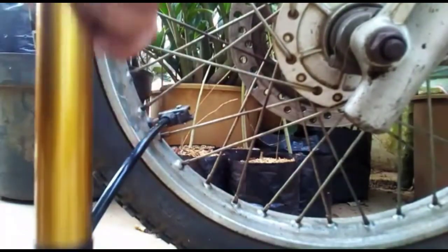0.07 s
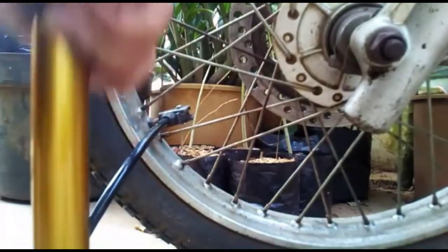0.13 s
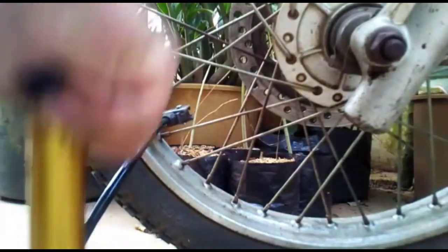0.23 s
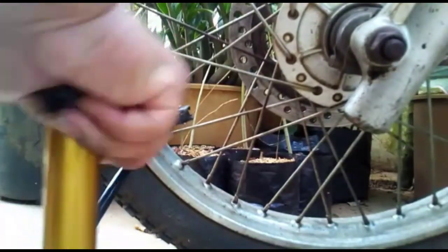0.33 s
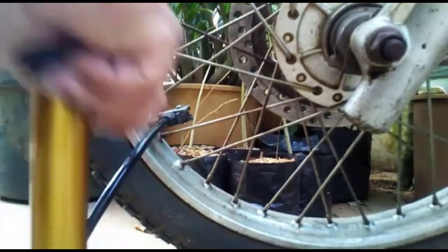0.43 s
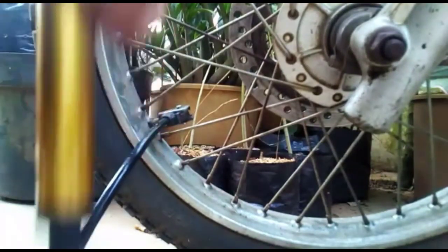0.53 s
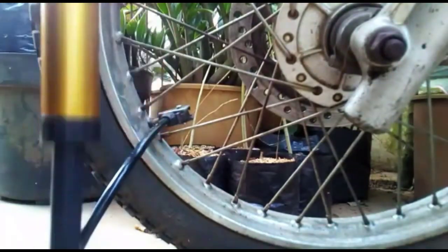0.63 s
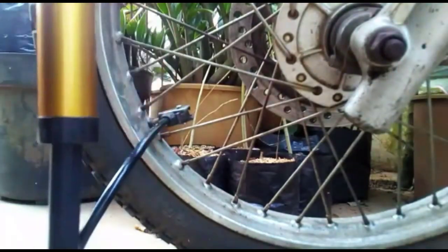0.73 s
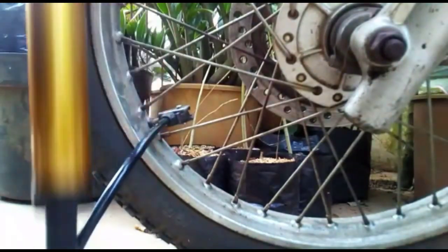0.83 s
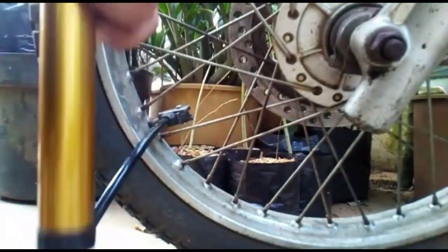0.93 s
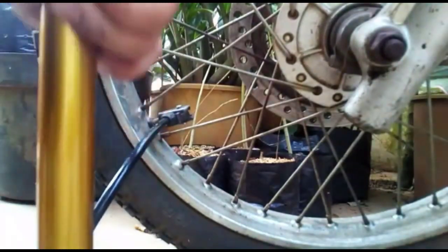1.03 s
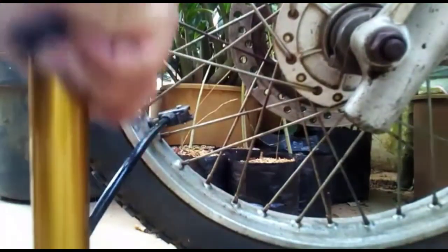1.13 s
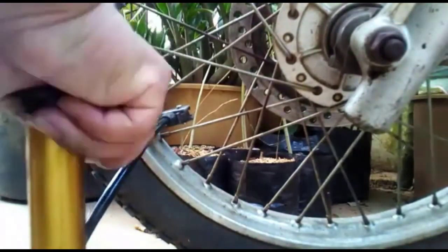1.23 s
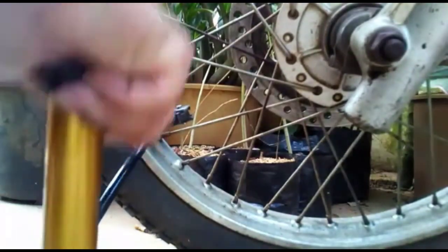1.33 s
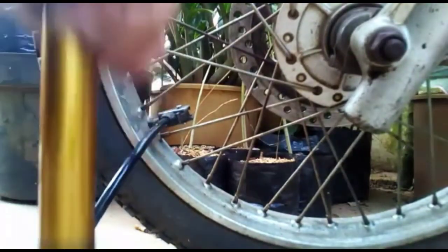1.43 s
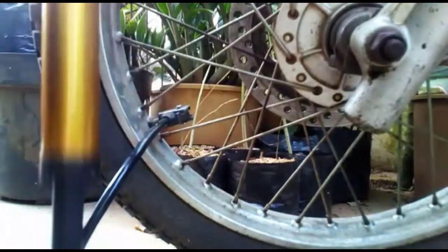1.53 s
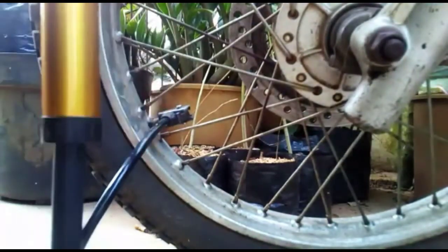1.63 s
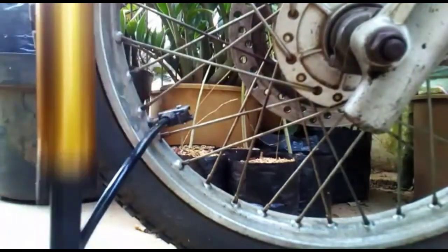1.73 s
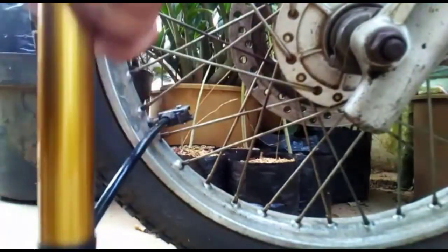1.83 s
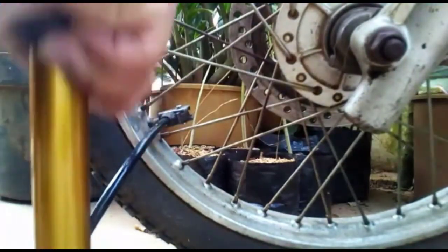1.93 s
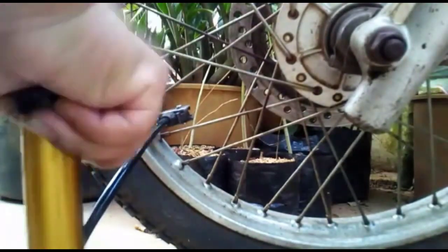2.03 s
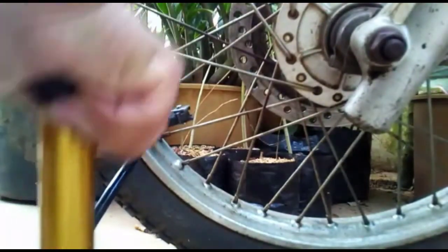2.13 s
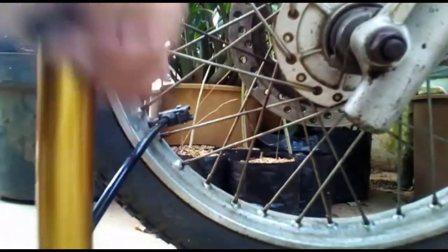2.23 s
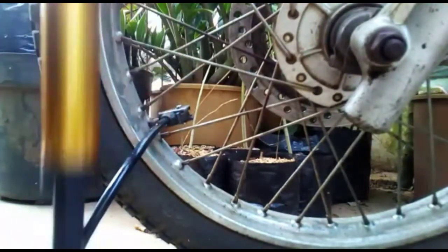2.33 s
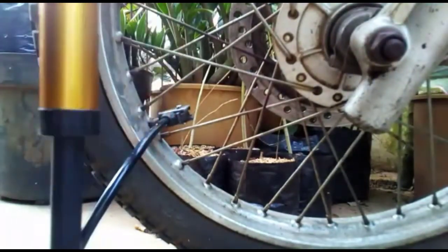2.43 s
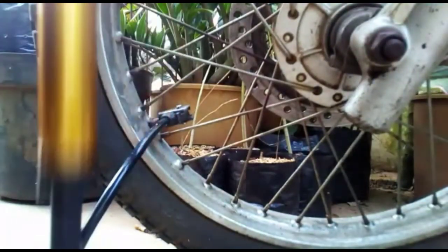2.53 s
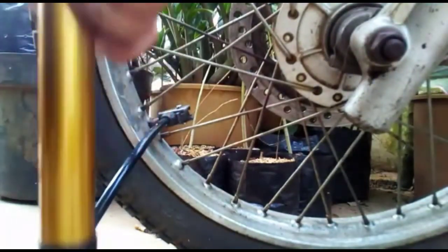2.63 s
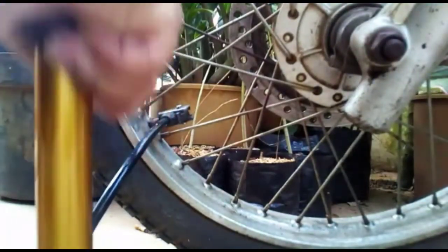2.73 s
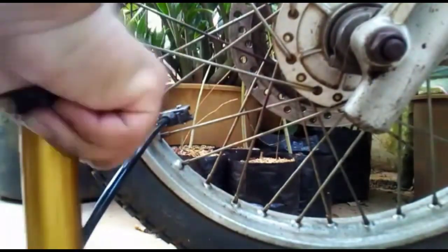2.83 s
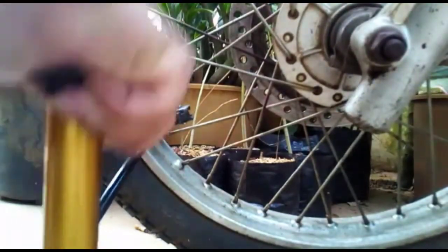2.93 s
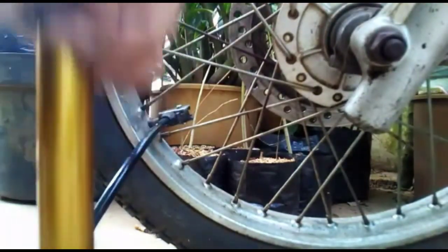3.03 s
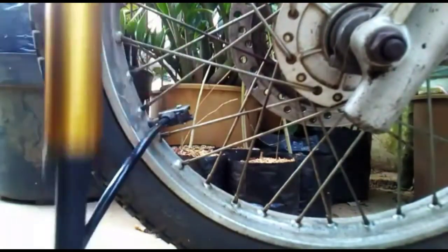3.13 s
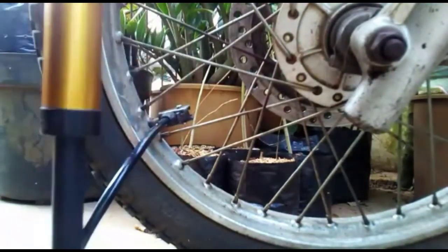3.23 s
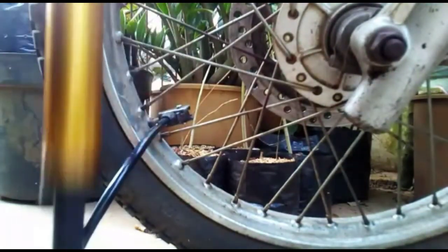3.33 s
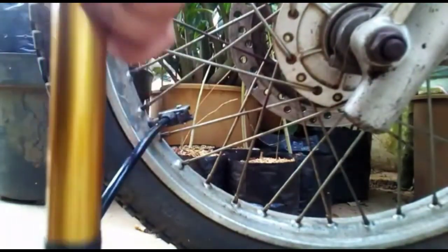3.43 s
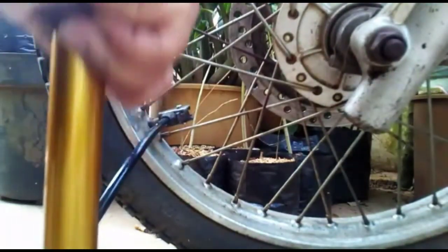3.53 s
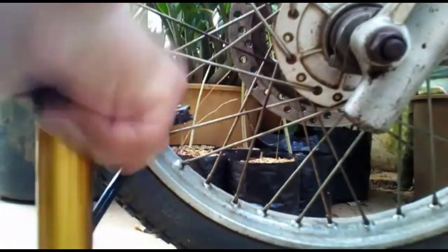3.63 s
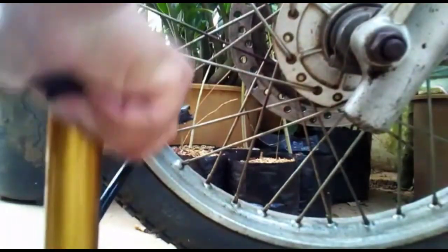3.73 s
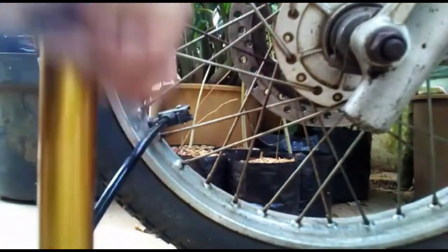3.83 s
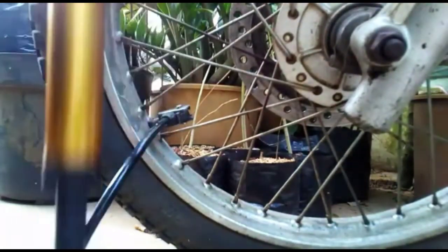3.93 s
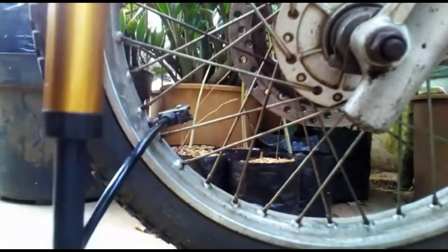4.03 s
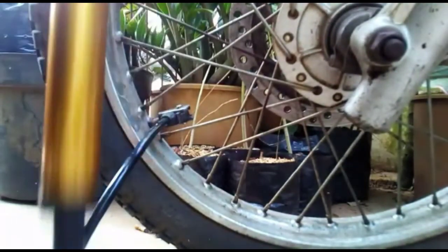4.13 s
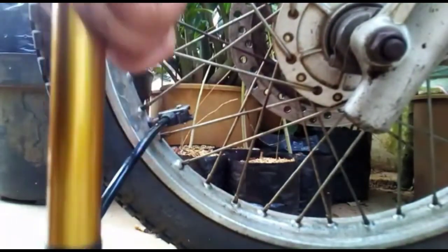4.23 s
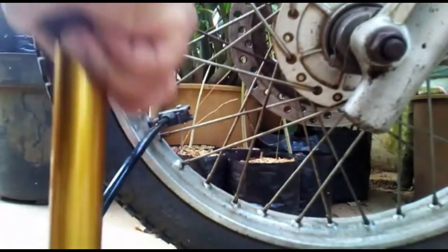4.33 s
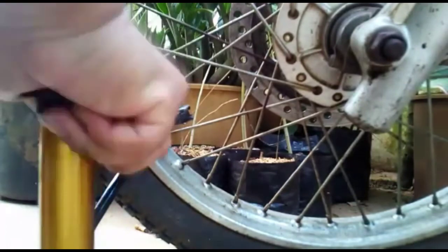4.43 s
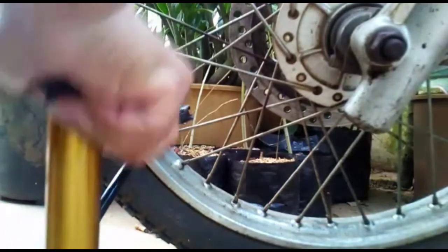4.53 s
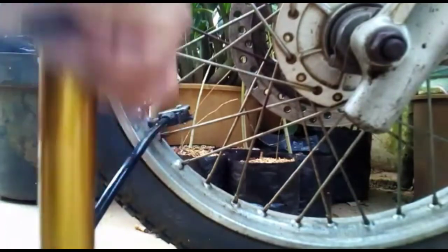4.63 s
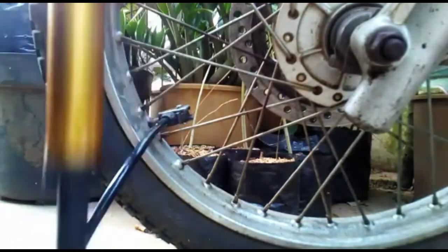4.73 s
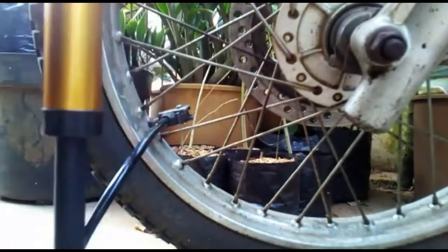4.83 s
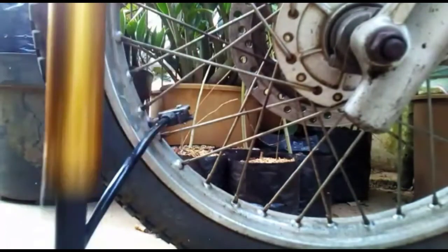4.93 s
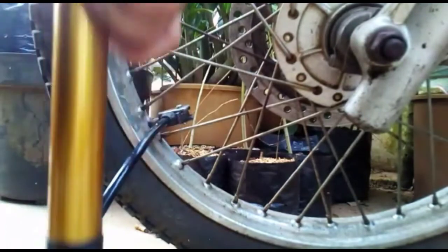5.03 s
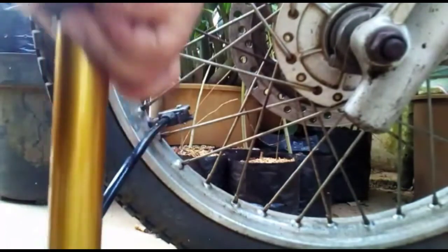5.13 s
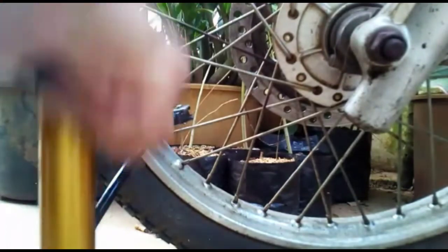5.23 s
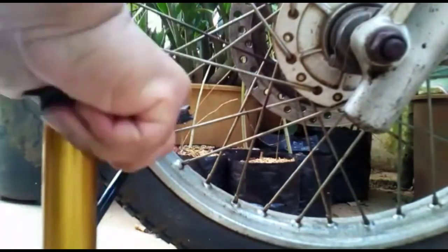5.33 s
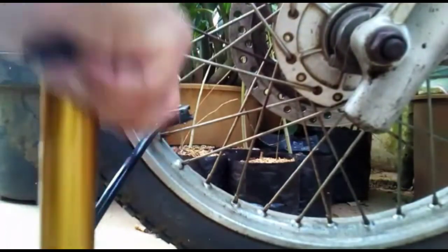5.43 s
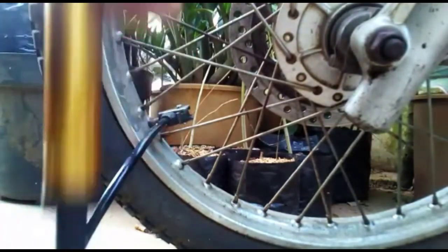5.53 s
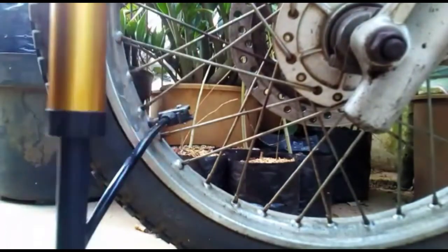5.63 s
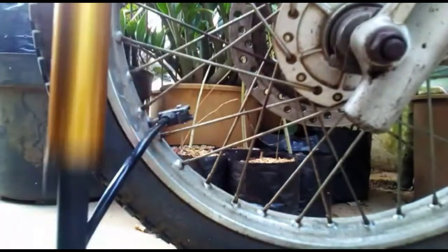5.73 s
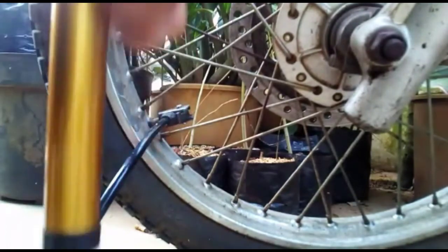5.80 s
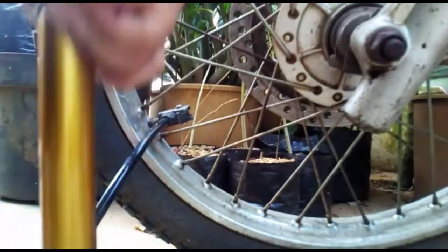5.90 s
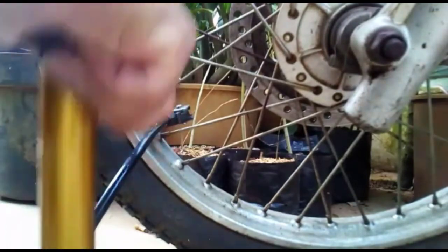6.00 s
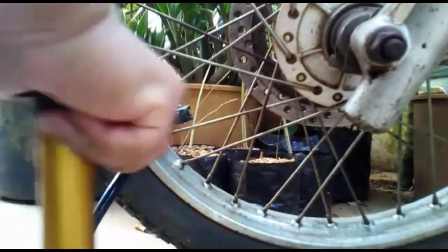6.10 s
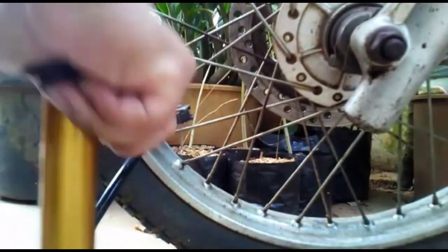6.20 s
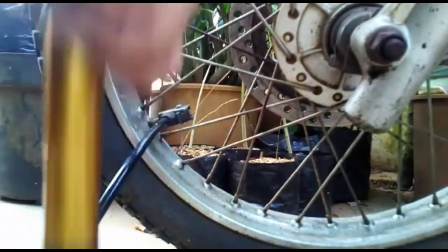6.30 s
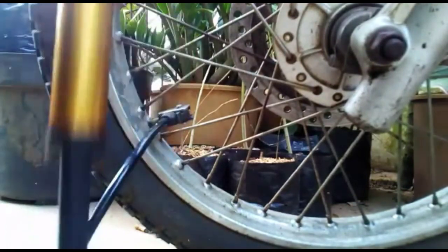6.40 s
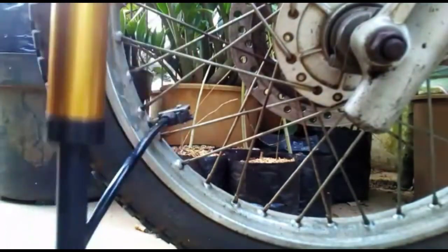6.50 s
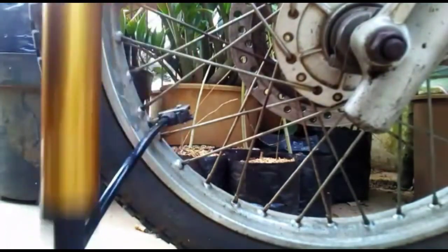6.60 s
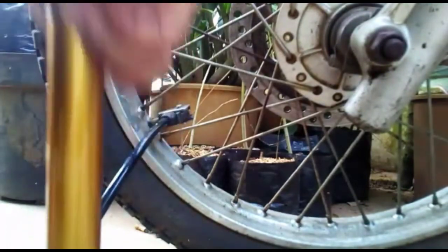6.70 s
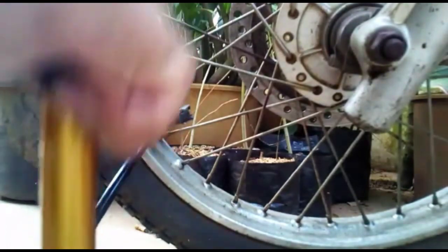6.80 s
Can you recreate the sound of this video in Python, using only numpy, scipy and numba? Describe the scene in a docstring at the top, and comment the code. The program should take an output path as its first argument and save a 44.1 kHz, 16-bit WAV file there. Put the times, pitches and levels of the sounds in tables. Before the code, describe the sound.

A hand pump is worked briskly in a yard, heard from very near. About every 0.8 seconds a hissing, whistling push stops with a clack, followed by a round low pop and a free airy pull. Light metallic ticks, gritty rubbing and brief high squeaks vary each stroke. Background is quiet air and low traffic rumble; the final push is cut off before its clack.

```python
"""A small hand pump inflates a motorcycle tyre in a yard, heard close by.
Air hisses past the sliding barrel and rings a chamber whose length follows the piston, so its resonances glide.
Each push surges and whistles mid-way; all but the last, which runs out of time, end in a clack.
Each pull creeps until the vacuum lets go with a hollow pop, a filtered pulse and ring, then draws air freely.
The seal squeaks and the loose barrel ticks in between, over wall echoes and faint far traffic."""
import sys
import numpy as np
from scipy import signal
from scipy.fft import rfft, irfft
from scipy.io import wavfile
from scipy.ndimage import uniform_filter1d
from numba import njit

SR = 44100
rng = np.random.default_rng(int(sys.argv[2]) if len(sys.argv) > 2 else 0)


def output_pcm(signal):
    """Save a mono or channel-first signal as 16-bit PCM at the path in sys.argv[1].

    Samples are clipped to [-1, 1] before scaling.
    """
    pcm = np.clip(np.atleast_2d(signal).T, -1, 1) * 32767
    wavfile.write(sys.argv[1], SR, np.round(pcm).astype(np.int16))


N = 302526
SOUND_M_S = 343


def undb(db):
    """Decibels to gain."""
    return 10 ** (np.asarray(db) / 20)


def unit(x):
    """Scale to rms 1."""
    return x / np.sqrt(np.mean(x ** 2))


def noise(count=N):
    """White noise."""
    return rng.standard_normal(count)


def seconds(length_s):
    """Time axis of a short sound."""
    return np.arange(int(length_s * SR)) / SR


def curve(rows):
    """Each column of a timed table, sample by sample."""
    s, *columns = np.transpose(rows)
    return [np.interp(np.arange(N) / SR, s, c) for c in columns]


def colour(x, points):
    """Filter by a (Hz, dB) outline, straight over log frequency."""
    hz, db = np.transpose(points)
    f = np.maximum(np.fft.rfftfreq(len(x), 1 / SR), 1)
    gain = undb(np.interp(np.log(f), np.log(hz), db))
    return irfft(rfft(x) * gain, len(x))


def band(x, hz, kind, order=2):
    """Butterworth filter."""
    sos = signal.butter(order, np.minimum(hz, .45 * SR), kind, fs=SR, output="sos")
    return signal.sosfilt(sos, x)


def walk(rate_hz):
    """Random wander through rate_hz points a second, spread near 1."""
    points = noise(int(N / SR * rate_hz) + 2)
    return np.interp(np.arange(N) / SR * rate_hz, np.arange(len(points)), points)


def ring(modes, t, scatter_db):
    """Decaying sines; every blow weights them a little differently."""
    total = 0
    for hz, db, t60_s in modes:
        gain = undb(db + scatter_db * rng.standard_normal())
        total = total + gain * np.sin(2 * np.pi * hz * t) * np.exp(-np.log(1000) * t / t60_s)
    return total


def add(out, s, x):
    """Mix a sound in at time s."""
    i = int(s * SR)
    out[i:i + len(x)] += x[:N - i]


def held(start_s, end_s, attack_s, release_s):
    """Envelope that grows up to the start, holds to the end and dies away, with e-fold times."""
    t = np.arange(N) / SR
    log_level = np.minimum((t - start_s) / attack_s, (end_s - t) / release_s)
    return np.exp(np.maximum(log_level, -20).clip(max=0))


def swell(s, rise_s, fall_s):
    """Bell-shaped envelope that peaks at time s."""
    t = np.arange(N) / SR - s
    return np.exp(-np.minimum((t / np.where(t < 0, rise_s, fall_s)) ** 2, 20))


# Outdoor background colour. Each row: frequency in Hz, gain in dB.
YARD_COLOUR = [(25, -10.5), (55, -9.5), (80, -2), (120, 4.5), (170, 3), (260, -4), (450, -5.5),
               (800, -16.5), (1500, -20), (3000, -22), (6000, -23.5), (9000, -46), (13800, -42),
               (15300, -35)]
# Distant traffic. Each row: time in seconds, mean level in dB.
TRAFFIC = [(0, -54.5), (.6, -52), (1.2, -52.5), (1.9, -51), (2.7, -54), (3.4, -55.5), (4.2, -56),
           (5.1, -58.5), (6, -56.5), (6.86, -56)]


def background(air_db=-49.0):
    """Steady outdoor air over the wavering rumble of far traffic: one noise, split by filters."""
    outdoors = unit(colour(noise(), YARD_COLOUR))
    level_db, = curve(TRAFFIC)
    rumble = unit(band(outdoors, 240, "low")) * undb(level_db + 1.2 * walk(8))
    return rumble + undb(air_db) * band(outdoors, 585, "high")


# Nearby walls. Each row: delay in seconds, gain in dB before the dulling filter.
ECHOES = [(0.0179, -23.5), (0.0239, -18.5), (.0275, -18), (0.0408, -22)]


def yard(x, tail_db=-13, t60_s=0.41, dull_hz=700, bright_db=-13):
    """A few dull wall echoes and a short scatter from pots and plants, as an impulse response."""
    t = seconds(.4)
    tail = noise(len(t)) * np.exp(-np.log(1000) * t / t60_s) * (t > .008)
    response = unit(tail) * undb(tail_db) / np.sqrt(len(t))
    for s, db in ECHOES:
        add(response, s, undb([db]))
    response = band(response, dull_hz, "low", order=1) + undb(bright_db) * response
    return signal.fftconvolve(x, response)[:N]


# Barrel and handle resonances. Each row: frequency in Hz, gain in dB, t60 in seconds.
BARREL = [(500, -13, 0.019), (1408, 12.5, 0.043), (1610, 4, 0.024), (1670, 9, 0.023), (1942, 5, 0.026),
          (2270, 5, 0.022), (2380, 0, 0.052), (2595, -9, 0.047), (3430, -19, 0.0057), (3960, -1.5, 0.036),
          (4820, 2, 0.003), (5170, 16, 0.0028), (5120, -20, 0.012), (6150, -10, 0.016), (6220, -1, 0.0056),
          (7100, -14, 0.015)]


def knock(treble_db, contact_s, scrape):
    """A rough contact rings the barrel; treble_db sets the treble share. Loudest 4 ms at rms 1."""
    t = seconds(.08)
    force = scrape * noise(len(t)) * np.exp(-t / contact_s)
    force[0] += 1
    body = signal.fftconvolve(force, ring(BARREL, t, scatter_db=5.5))[:len(t)]
    low = band(body, [1150, 3050], "band", order=3)
    high = band(body, [3200, 7200], "band", order=5)
    share = min(undb(treble_db), .97)
    sound = np.sqrt(1 - share ** 2) * unit(low) + share * unit(high)
    return sound / np.sqrt(uniform_filter1d(sound ** 2, size=176).max())


# Loose barrel and hose fitting. Each row: time in seconds, level in dB before trim, treble share in dB.
TICKS = [(0.272, -31, 0), (0.954, -30, 1.5), (1.525, -34.5, -8), (1.55, -39, -12), (1.869, -35, -9),
         (2.033, -32.5, -1.5), (2.288, -32.5, -10.5), (2.366, -32, 0), (2.665, -32, -5), (2.833, -35.5, -3),
         (3.138, -39.5, -6), (3.161, -30.5, 0.5), (3.463, -36, -3.5), (5.0588, -25.5, -1),
         (5.572, -38.5, -21), (6.3289, -23, -17), (6.696, -37, -2.5)]


def ticks(trim_db=-1, slack_db=-39.5, slack_treble_db=-10):
    """Light, scraping knocks as the barrel rocks on its rod, and one as each pull takes up the slack."""
    out = np.zeros(N)
    slack_ticks = [(s, slack_db, slack_treble_db) for s, *_ in PULLS]
    for s, db, treble_db in TICKS + slack_ticks:
        add(out, s, undb(db + trim_db) * knock(treble_db, contact_s=0.0014, scrape=0.34))
    return out


# Piston meets the end stop. Each row: time in seconds, base level in dB, treble share in dB,
# thud in dB re the base. Trims in clacks() add to the levels.
CLACKS = [(.3826, -24.5, -7, -12), (1.3424, -22, -9, -20), (2.1585, -21.5, -5, -8), (2.9522, -24.5, -6, -1),
          (3.7678, -20.5, -17, -14), (4.5532, -25, -8, -11), (5.3894, -25.5, -9, -9),
          (6.1944, -27.5, -8, -1)]


def burst(t, decay_s, band_hz, order):
    """Decaying noise through a band."""
    return band(noise(len(t)) * np.exp(-t / decay_s), band_hz, "band", order=order)


def clacks(clack_db=-1, touch_db=-8, touch_lead_s=.002, thud_db=-2, thud_s=0.0074,
           snap_db=3, snap_s=0.0016, crack_db=12, crack_s=0.00042):
    """The piston touches the stop with a thud through the base, then lands with a crack and a snap."""
    out, t = np.zeros(N), seconds(.08)
    for s, db, treble_db, low_db in CLACKS:
        add(out, s - touch_lead_s, undb(db + touch_db) * knock(0.21, 0.00061, 0.51))
        add(out, s, undb(db + clack_db) * knock(treble_db, 0.00081, 0.29))
        thud = burst(t, thud_s, [210, 900], order=2)
        snap = burst(t, snap_s, [1300, 5200], order=4)
        crack = burst(t, crack_s, [1500, 5400], order=5)
        add(out, s - touch_lead_s, undb(db + low_db + thud_db) * 2 * thud / np.abs(thud).max())
        add(out, s, undb(db + snap_db) * snap)
        add(out, s, undb(db + crack_db) / 2 * crack / np.abs(crack).max())
    return out


# Vacuum lets go. Each row: time in seconds, base level in dB, lead of the first leak in seconds,
# leak in dB re the base, hollow ring in dB re the base.
POPS = [(0.5336, -17.5, 0.0045, -4, 1), (1.4729, -16, 0.0045, -7, -0.5), (2.2986, -16.5, 0.0042, -5.5, 1.5),
        (3.0859, -12, 0.0028, -14, -3.5), (3.9005, -13.5, 0.004, -8.5, -2.5),
        (4.7066, -15.5, 0.0045, -14, 1), (5.5376, -11, 0.0041, -17, -2), (6.3522, -19, 0.0054, -24, 3)]
# Air modes of the opened barrel. Each row: frequency in Hz, gain in dB, t60 in seconds.
CAVITY = [(225, -6, 0.025), (287, -12.5, 0.067), (412.7, -2, 0.056), (454, -34.5, 0.073),
          (760, -20.5, 0.01), (949, -26, 0.08)]


def pressure_pulse(t, centre_s, width_s):
    """Smooth pulse with a dip on either side."""
    u = (t - centre_s) / width_s
    return (1 - u ** 2) * np.exp(-u ** 2 / 2)


def pops(rush_s=0.00061, rush_db=-4, ring_lead_s=0.001654, leak_s=0.00048, leak_ring_db=-8):
    """Air rushes into the evacuated barrel: a small leak, one smooth pressure pulse, then a hollow ring."""
    out, t = np.zeros(N), seconds(.15)
    centre_s = .005
    leak = pressure_pulse(t, centre_s, leak_s)
    rush = pressure_pulse(t, centre_s, rush_s)
    for s, db, lead_s, leak_db, ring_db in POPS:
        # the piston is never at quite the same place, so the pitch varies
        stretch = 1 + 0.02 * rng.standard_normal()
        hollow = band(ring(CAVITY, t * stretch, scatter_db=1.5), 150, "high")
        add(out, s - centre_s - lead_s, undb(db + leak_db) * leak)
        add(out, s - lead_s, -undb(db + leak_db + leak_ring_db) * hollow)
        add(out, s - centre_s, undb(db + rush_db) * rush)
        add(out, s - ring_lead_s, -undb(db + ring_db) * hollow)
    return out


# Brief seal squeaks. Each row: time in seconds, chirp level at the peak in dB rms, Gaussian spread in seconds.
SQUEAKS = [(0.231, -33.5, 0.0014), (0.267, -33, 0.0031), (0.637, -40, .003), (1.159, -42, 0.0042),
           (2.518, -32.5, 0.0026), (4.186, -40.5, 0.0025), (4.253, -37, .0024), (4.8, -32.5, .003),
           (4.909, -27, 0.0035), (5.732, -33, 0.0041), (5.992, -38, 0.002), (6.01, -37, 0.0031),
           (6.616, -40.5, 0.0033)]


def squeaks(squeak_hz=4250, width_hz=450, rasp_db=-5):
    """Short slips of the seal chirp: gated narrow-band noise with some hiss."""
    t = np.arange(N) / SR
    slips = sum(undb(db) * np.exp(-((t - s) / spread_s) ** 2 / 2) for s, db, spread_s in SQUEAKS)
    chirp = unit(band(noise(), [squeak_hz - width_hz / 2, squeak_hz + width_hz / 2], "band"))
    rasp = unit(colour(noise(), HISS_COLOUR))
    return slips * (chirp + undb(rasp_db) * rasp)


# Pushes. Each row: air starts, first surge, mid-way, all in seconds; hiss in dB steady, in the surge,
# mid-way, before the stop; rub in dB steady, in the surge.
PUSHES = [(.06, .118, .245, -44, -37, -36, -45, -52, -56), (.925, .958, 1.15, -46, -35, -45, -46, -57, -43),
          (1.85, 1.888, 2.015, -48, -36, -40, -43, -57, -50),
          (2.622, 2.67, 2.812, -46, -33.5, -42, -46, -55, -41),
          (3.457, 3.474, 3.605, -47, -35, -38, -39, -58, -45),
          (4.24, 4.272, 4.385, -49, -37, -45, -38, -57, -53),
          (5.015, 5.078, 5.21, -46, -34, -47, -35, -60, -45),
          (5.812, 5.897, 6.018, -43, -33.5, -34, -42, -57, -48),
          (6.625, 6.705, 6.825, -42, -39, -33, -42, -54, -51)]
# Pulls. Each row: slack taken up, air flows freely, mid-way, hand slows, all in seconds;
# hiss in dB steady, mid-way; steady rub in dB.
PULLS = [(.494, .575, .635, .765, -42, -33, -52), (1.44, 1.555, 1.575, 1.655, -39, -41, -52),
         (2.263, 2.36, 2.39, 2.46, -42, -41, -53), (3.045, 3.14, 3.18, 3.28, -38, -39, -50),
         (3.855, 3.945, 3.985, 4.11, -41, -35, -54), (4.659, 4.755, 4.80, 4.90, -38.5, -35, -53),
         (5.486, 5.585, 5.62, 5.73, -37, -37, -52), (6.293, 6.40, 6.435, 6.485, -38, -32, -53)]
# Harsh barrel drags. Each row: start in seconds, length in seconds, rub in dB, hiss in dB.
SCRAPES = [(2.087, 0.05, -39, -41), (2.176, 0.35, -47, -51.5), (3.775, 0.019, -43.5, -61),
           (6.635, .02, -55, -60)]
ATTACK_S, RELEASE_S = .018, 0.022
LAST_STOP_S = 6.95  # beyond the end of the sound


def stops():
    """Times at which the pushes end."""
    return [s for s, *_ in CLACKS] + [LAST_STOP_S]


def flow(midway_rub_db=-22, surge_rise_share=0.74, surge_fall_s=0.037, midway_s=0.024,
         creep_s=0.039, creep_hiss_db=-54, creep_rub_db=-52.5,
         build_s=0.052, cut_s=0.017, bleed_s=0.041, press_rub_db=-48):
    """Gains of hiss and rub: steady while the piston moves, swelling in the surge and mid-way."""
    parts = []  # (envelope, hiss dB, rub dB)
    for push, stop in zip(PUSHES, stops()):
        start, surge, midway, hiss_db, surge_db, midway_db, press_db, rub_db, surge_rub_db = push
        surge_rise_s = surge_rise_share * (surge - start)
        parts += [(held(start, stop, ATTACK_S, RELEASE_S), hiss_db, rub_db),
                  (swell(surge, surge_rise_s, surge_fall_s), surge_db, surge_rub_db),
                  (swell(midway, midway_s, midway_s), midway_db, midway_db + midway_rub_db),
                  # the hiss builds before the end stop and is cut by it
                  (held(stop, stop, build_s, cut_s), press_db, -np.inf),
                  # the loaded seal rubs on as the pressure bleeds off
                  (held(stop, stop, bleed_s, bleed_s), -np.inf, press_rub_db)]
    for slack, free, midway, slows, hiss_db, midway_db, rub_db in PULLS:
        # first a slow creep against the vacuum
        parts += [(held(slack, slack + creep_s, ATTACK_S / 2, RELEASE_S), creep_hiss_db, creep_rub_db),
                  (held(free, slows, ATTACK_S, RELEASE_S), hiss_db, rub_db),
                  (swell(midway, midway_s / 2, midway_s), midway_db, midway_db + midway_rub_db)]
    for s, length_s, rub_db, hiss_db in SCRAPES:
        parts.append((held(s, s + length_s, ATTACK_S, RELEASE_S), hiss_db, rub_db))
    hiss_power = sum((shape * undb(db)) ** 2 for shape, db, _ in parts)
    rub_power = sum((shape * undb(db)) ** 2 for shape, _, db in parts)
    return np.sqrt(hiss_power), np.sqrt(rub_power)


# Chamber length in m during a push: at the top, in the surge, just after it, mid-way, at the end stop.
PUSH_M = (.028, .06, .085, .1, .135)
# Chamber during a pull. Each row: time from mid-way in seconds, length in m.
PULL_PATH = [(-.08, .135), (-.025, .114), (0, .1), (.03, .084), (.065, .062), (.11, .043)]


def chamber(surge_length_s=.055, unsteady=0.00703):
    """Length of the air chamber (m) as the hand pushes and pulls, never quite evenly."""
    path = []
    for (start, surge, midway, *_), stop in zip(PUSHES, stops()):
        # the piston covers the stretch after the surge quickly
        times = (start - 2 * ATTACK_S, surge, surge + surge_length_s, midway, stop)
        path += zip(times, PUSH_M)
    for _, _, midway, *_ in PULLS:
        path += [(midway + s, m) for s, m in PULL_PATH]
    length_m, = curve(sorted(path))
    return uniform_filter1d(length_m * (1 + unsteady * walk(35)), size=900)


# Whistling ease of the air gap. Each row: pitch in Hz, gain in dB.
GAP = [(2200, -44), (2750, -11), (3150, -13), (3600, -28), (4050, -3.5), (4500, -0.5), (4850, -22),
       (5500, -13), (6500, -19), (7200, -27), (8000, -34)]
# Whistling quarter-wave modes. Each row: odd multiple, gain in dB.
WHISTLES = [(3, 3), (5, 6), (7, -3)]


def whistle(length_m, width_hz=42, full_speed_m_s=0.14, patchy_db=3):
    """Turbulence feeds the chamber modes; they need a fast piston and swell at the pitch the gap favours."""
    hz, db = np.transpose(GAP)
    drive = np.minimum(np.abs(np.gradient(length_m)) * SR / full_speed_m_s, 1)
    sound, power = 0, 0
    for multiple, mode_db in WHISTLES:
        pitch_hz = multiple * SOUND_M_S / (4 * length_m)
        phase = 2 * np.pi * np.cumsum(np.minimum(pitch_hz, SR / 4)) / SR
        gap_db = np.interp(pitch_hz, hz, db, right=-np.inf)
        gain = drive * undb(gap_db + mode_db + patchy_db * walk(55))
        # higher modes lose more energy and are broader
        rate_hz = width_hz * multiple
        tone = unit(walk(rate_hz) * np.sin(phase) + walk(rate_hz) * np.cos(phase))
        sound = sound + gain * tone
        power = power + gain ** 2
    return sound, power


def eddies(x, depth_db, rate_hz):
    """Turbulence makes every 400 Hz band swell and sink on its own; the outer bands are merged."""
    spectrum = rfft(x)
    slot = np.clip(np.fft.rfftfreq(N, 1 / SR) // 400, 7, 19)
    return sum(irfft(spectrum * (slot == k), N) * undb(depth_db * walk(rate_hz)) for k in np.unique(slot))


@njit
def stopped_pipe(x, lag, reflection):
    """Sound returns inverted after a moving round trip: odd quarter-wave resonances."""
    y = x.copy()
    for i in range(256, len(x)):
        k = int(lag[i])
        part = lag[i] - k
        y[i] -= reflection * ((1 - part) * y[i - k] + part * y[i - k - 1])
    return y


# Air hiss colour. Each row: frequency in Hz, gain in dB.
HISS_COLOUR = [(1500, -56), (2900, -22.5), (3600, -5.5), (4050, 3), (4370, 7), (4750, -4), (5100, -2),
               (5550, 3.5), (6300, -2.5), (7000, -11.5), (7700, -22.5), (8400, -35), (9500, -30),
               (13500, -60)]
# Rubbing seal colour. Each row: frequency in Hz, gain in dB.
RUB_COLOUR = [(50, -22), (250, 5), (600, 0.5), (950, -0.5), (1250, 4), (1385, 10.5), (1520, 4), (1750, 0.5),
              (2050, 5), (2250, 1.5), (2420, 1.5), (2600, -0.5), (2820, 7.5), (3200, 1.5), (5000, -35)]


def sliding(reflection=0.17, rub_reflection=0.26, grit_db=2.0, flutter_db=2.03, spit_db=-15, spit_s=0.094):
    """Air hiss, its whistles and the gritty rub of the seal, all coloured by the changing chamber."""
    hiss_gain, rub_gain = flow()
    t, length_m = np.arange(N) / SR, chamber()
    round_trip = 2 * length_m / SOUND_M_S * SR  # samples
    air = eddies(noise(), depth_db=3.6, rate_hz=70) * undb(1.3 * walk(900))
    hiss = unit(colour(stopped_pipe(air, round_trip, reflection), HISS_COLOUR))
    # the whistles take their energy from the hiss
    tones, power = whistle(length_m)
    hiss = (hiss + tones) / np.sqrt(1 + power)
    # pressure peaks just before each clack, and the jet turns brighter
    pressure = sum(np.exp(-((t - s) / spit_s) ** 2) * (t < s) for s, *_ in CLACKS)
    hiss += undb(spit_db) * pressure * unit(band(noise(), [6200, 8800], "band", order=3))
    grit = noise() * undb(grit_db * walk(1100))
    rub = unit(colour(stopped_pipe(grit, round_trip, rub_reflection), RUB_COLOUR))
    # the seal sticks and slips, so the flow flutters
    hiss = undb(flutter_db * walk(130)) * hiss * hiss_gain
    rub = undb(flutter_db * walk(130)) * rub * rub_gain
    return hiss + rub


def scene():
    """The pump close by, its echoes and the background."""
    pump = sliding() + squeaks() + clacks() + ticks() + pops()
    return (pump + yard(pump) + background())[None]


def record(dry, top_hz=15600):
    """A steep elliptic low-pass cuts the top."""
    return signal.sosfilt(signal.ellip(10, .2, 70, top_hz, fs=SR, output="sos"), dry)


dry = scene()
out = record(dry)
output_pcm(out)
```